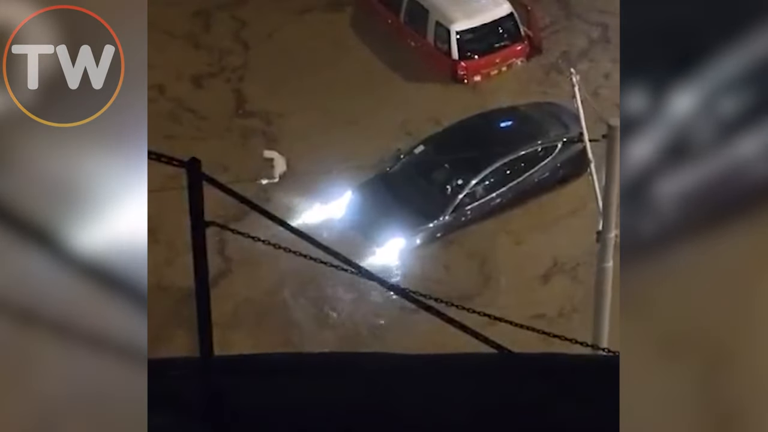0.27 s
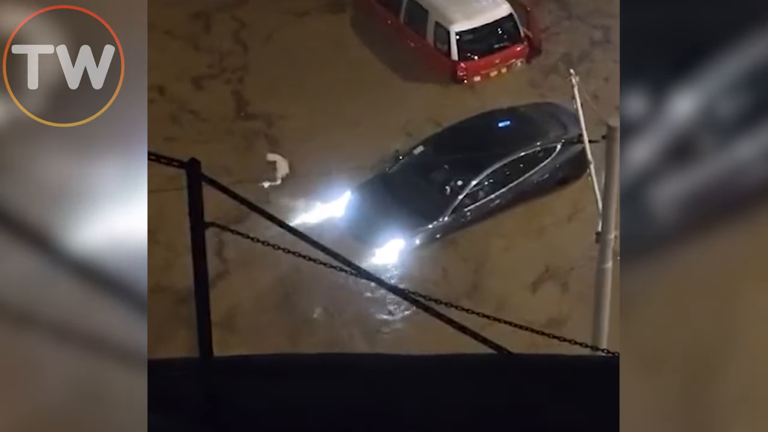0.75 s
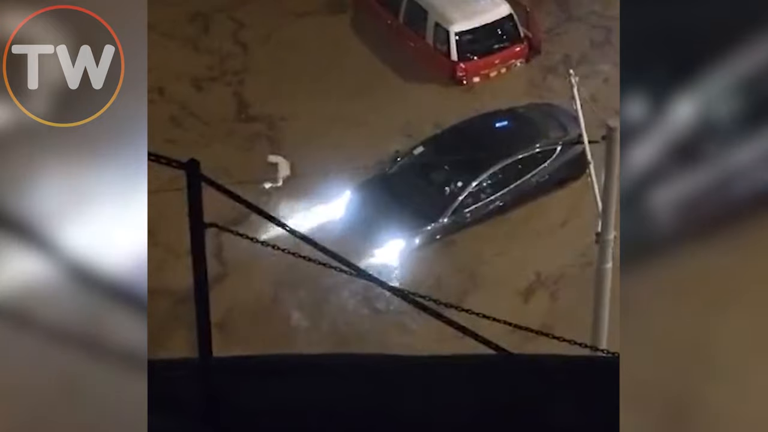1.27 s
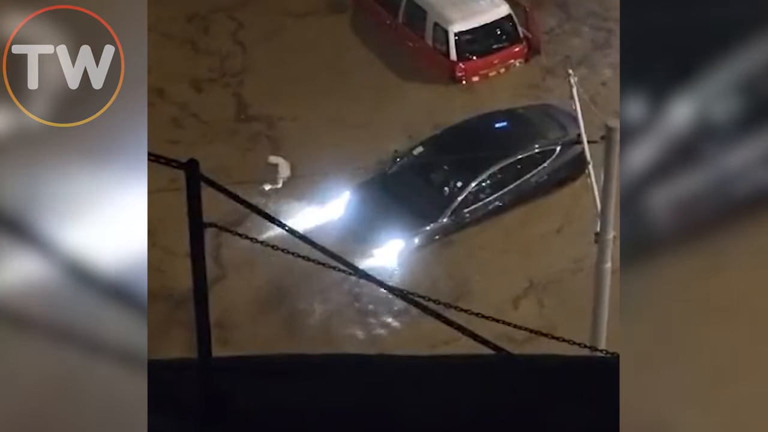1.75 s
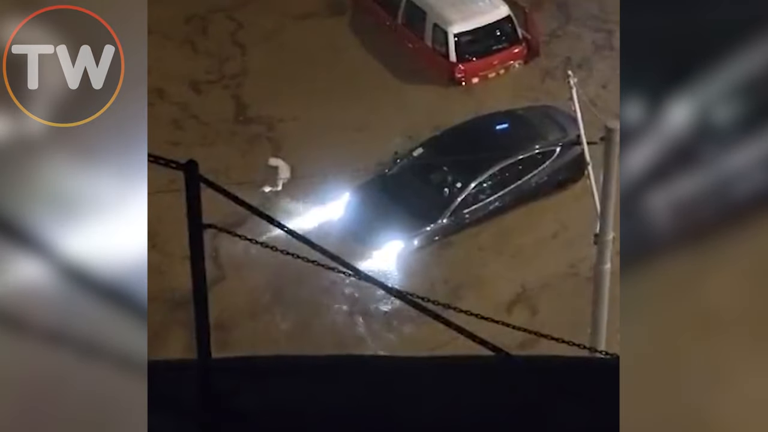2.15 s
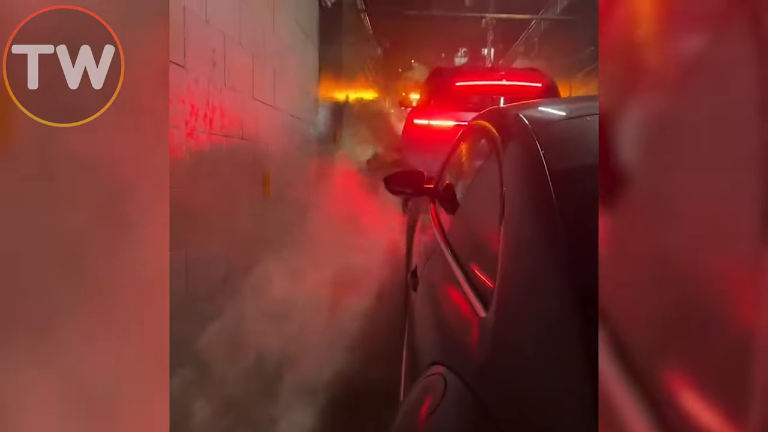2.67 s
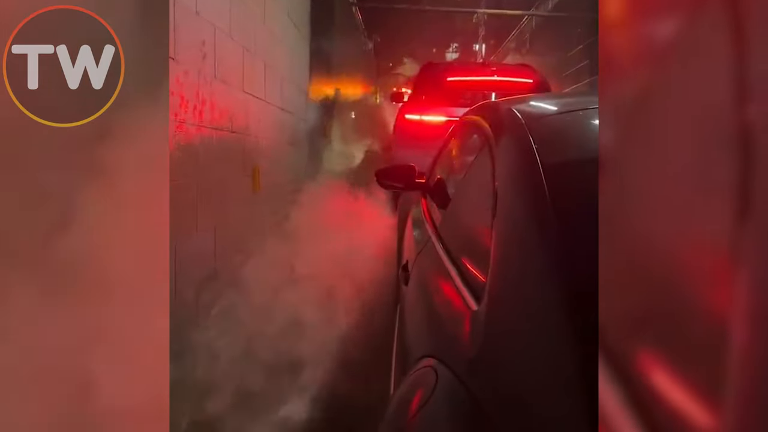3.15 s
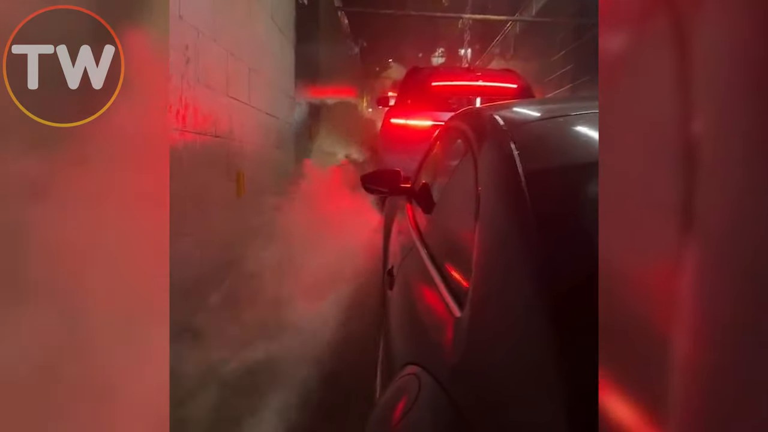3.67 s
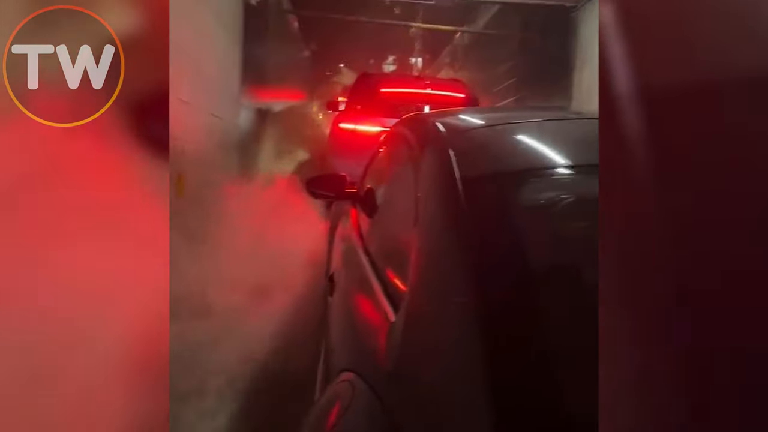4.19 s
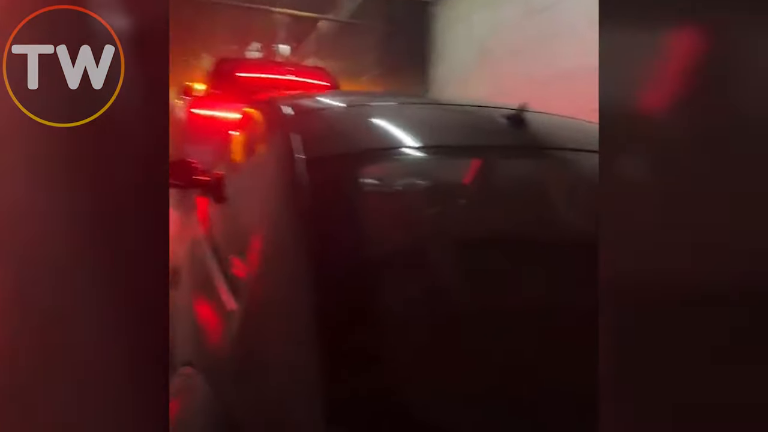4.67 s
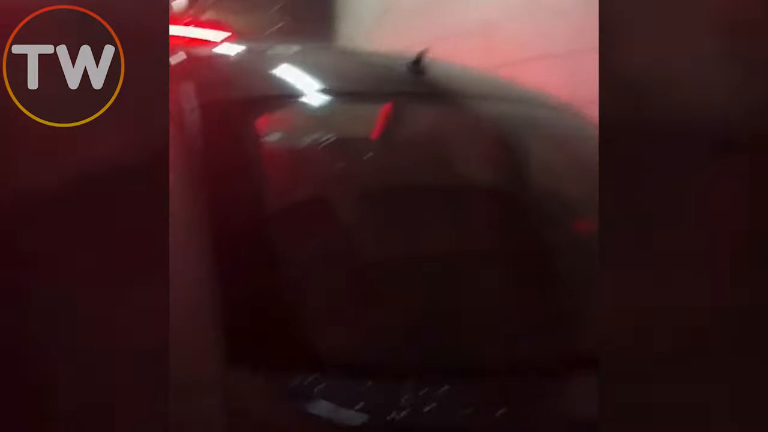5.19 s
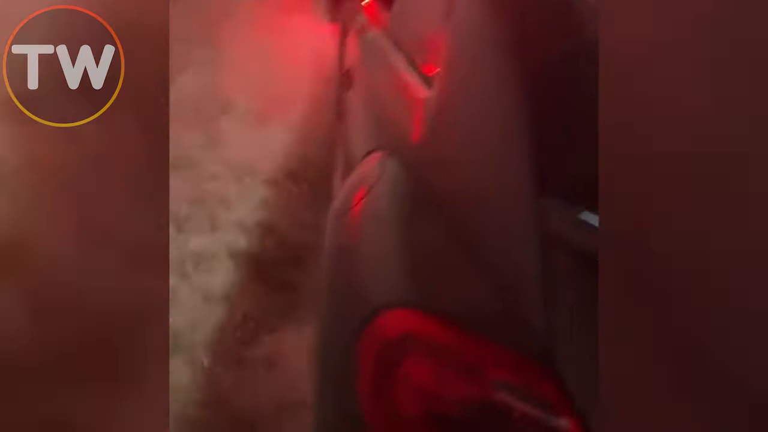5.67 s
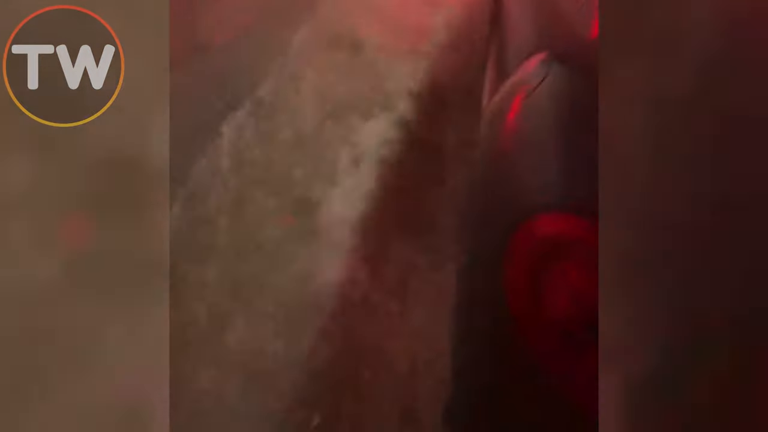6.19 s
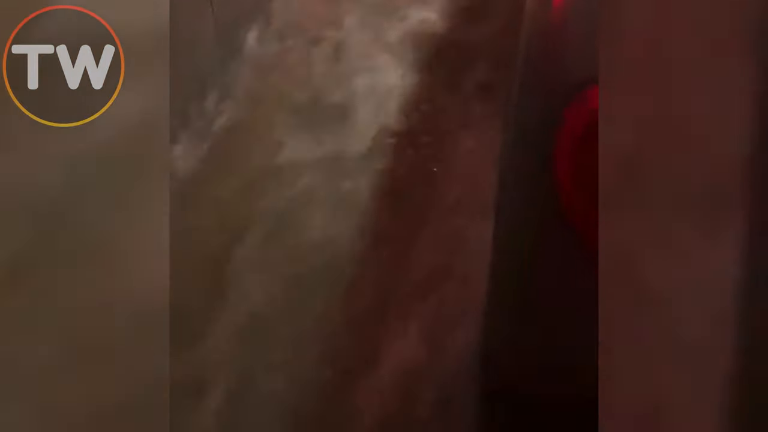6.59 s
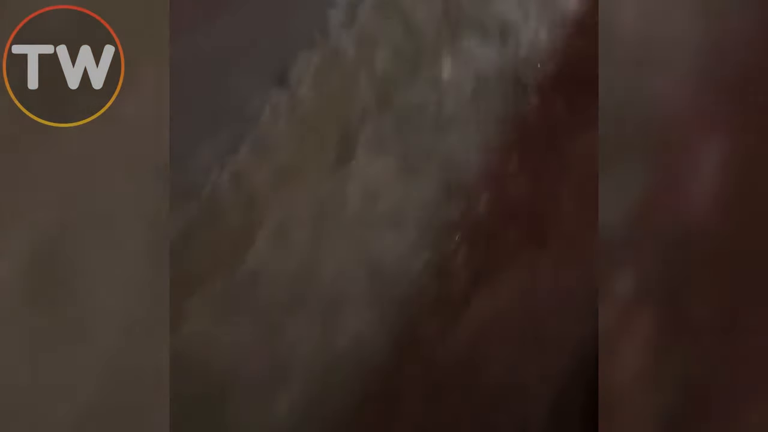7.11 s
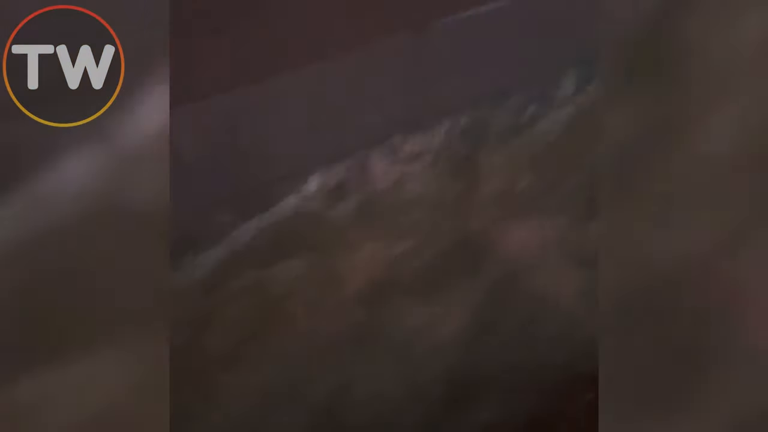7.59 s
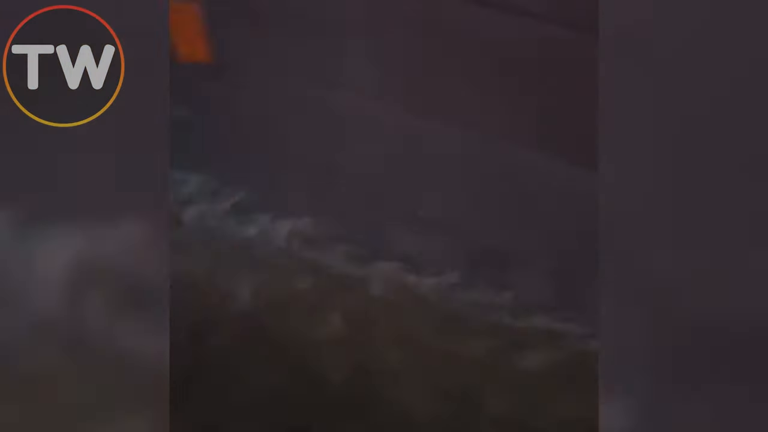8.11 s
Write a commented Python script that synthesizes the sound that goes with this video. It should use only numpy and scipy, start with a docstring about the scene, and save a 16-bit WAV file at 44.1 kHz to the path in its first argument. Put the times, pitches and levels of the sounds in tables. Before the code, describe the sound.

Loud sloshing water and rain over a low labouring car engine stop with a sharp tick; after a gap, a smoother, quieter torrent roars on.

```python
"""A flood, heard as two mono scenes with a short silence between them.
First a drowned street: noise bands make surging water and pattering rain, and a sine with one overtone
makes a labouring car engine. Early on, a few wavering sines squeal briefly.
A sharp tick ends the street, and a moment of silence follows.
Then a torrent pours down a garage ramp: a smoother roar of bubbles and spray, loud at first, then quieter."""
import sys
import numpy as np
from scipy import signal
from scipy.io import wavfile
from scipy.ndimage import uniform_filter1d

SR = 44100
rng = np.random.default_rng(int(sys.argv[2]) if len(sys.argv) > 2 else 0)


def wav_out(sig):
    """Save sig, one row per channel (or a flat mono array), as 16-bit PCM at SR to the path in sys.argv[1]."""
    wavfile.write(sys.argv[1], SR, np.round(np.clip(np.atleast_2d(sig).T, -1, 1) * 32767).astype(np.int16))


N = 368182
TIME = np.arange(N) / SR
LOWEST_HZ, CUTOFF_HZ = 20, 13800
STREET_END_S, RAMP_START_S, RAMP_FADE_S = 2.3665, 2.635, 0.014


def street():
    """Waves slosh unevenly over the road while rain falls on them; both slowly build."""
    # relative loudness of the street water at each pitch: [f/Hz, level/dB]
    wash_colour = [(25, -17.5), (45, -12.5), (100, -4.5), (195, -3.5), (255, 0), (330, -0.5), (420, 1.5),
                   (720, -3), (1200, 1), (1800, -0.5), (2450, -1.2), (3100, -7), (4200, -13), (13000, -35)]
    # relative loudness of the rain at each pitch: [f/Hz, level/dB]
    rain_colour = [(1500, -9.5), (3000, -5.5), (5000, -0.5), (7000, -1.5), (8700, 0), (10200, -21),
                   (12000, -18.5), (13500, -3)]
    # waves that slap and swell: [t/s, level/dB]
    swells = [(.57, 1.5), (.9, 0.7), (1.25, 0.5), (1.6, 1.3), (1.9, 0.7), (2.34, 0.3)]
    swell_width_s = 0.09
    # levels at the start, and how fast they build as the car pushes into the water
    wash_start_db, churn_start_db, rain_start_db = -17.0, -16, -27.4
    build_db_per_s, churn_build_db_per_s = 0.3, 0.6

    wave_bands = water(wash_colour, per_s=2000, spread_db=1.5, near_share=0.4,
                       patchy_db=1.42, patch_rate=16, count=32)
    rain_bands = water(rain_colour, per_s=3900, spread_db=1.5, near_share=0.21,
                       patchy_db=1.0, patch_rate=9.1, count=16)
    wash_db = wash_start_db + build_db_per_s * TIME
    churn_db = churn_start_db + churn_build_db_per_s * TIME
    rain_db = rain_start_db + build_db_per_s * TIME
    wash = flow(wave_bands, wash_db, churn_db, split_hz=910)
    rain = from_db(rain_db) * sum(band for hz, band in rain_bands)
    swell_db = bumps(swells, swell_width_s)
    return flicker(from_db(swell_db) * (wash + rain))


def ramp():
    """Fast water between concrete walls: bubbles merge to an even roar, with fizzing spray on top."""
    # relative loudness of the torrent at each pitch: [f/Hz, level/dB]
    torrent_colour = [(25, -25), (36, -16), (48, -9), (66, -0.5), (105, -2), (140, 0.5), (320, 2.5),
                      (490, 1), (680, -1.5), (1400, -3), (2400, -2.5), (3200, -4.5), (4500, -12.5),
                      (13000, -20.5)]
    # relative loudness of its spray at each pitch: [f/Hz, level/dB]
    spray_colour = [(1500, -13), (3500, -4), (5600, 0.5), (7500, -4), (10000, -8.5), (12500, -13.5),
                    (13500, -7)]
    # levels once the torrent has settled
    settled_rush_db, settled_churn_db, settled_spray_db = -25.5, -28, -34
    # it starts louder, drops quickly, then settles
    drop_s, drop_length_s, drop_db = 3.134, 0.042, 2.5
    settle_db, settle_s = 4.5, 0.57
    # from here on the roar grows and the spray recedes
    turn_s = 4.56
    rush_db_per_s, churn_db_per_s, spray_db_per_s = 0.43, 0.66, -1

    unsettled = np.exp(-np.maximum(TIME - drop_s, 0) / settle_s)
    extra_db = drop_db * (1 - rise(drop_s, drop_length_s)) + settle_db * unsettled
    since_turn_s = np.maximum(TIME - turn_s, 0)
    bubble_bands = water(torrent_colour, per_s=5000, spread_db=2.5, near_share=0.21,
                         patchy_db=0.84, patch_rate=12.4, count=30)
    spray_bands = water(spray_colour, per_s=6000, spread_db=4.0, near_share=0.27,
                        patchy_db=1.3, patch_rate=17, count=12)
    rush_db = settled_rush_db + rush_db_per_s * since_turn_s
    churn_db = settled_churn_db + churn_db_per_s * since_turn_s
    spray_db = settled_spray_db + spray_db_per_s * since_turn_s + 0.5 * drift(rate=20)
    roar = flow(bubble_bands, rush_db, churn_db, split_hz=590)
    spray = from_db(spray_db) * sum(band for hz, band in spray_bands)
    return from_db(extra_db) * (roar + spray)


def squeal(level_db, waver_hz, flutter_db):
    """A short, high, rough squeal: a wavering tone with weaker chatter tones on both sides of it."""
    # the tone and its chatter, placed by distance from the pitch: [f/Hz, level/dB]
    squeal_lines = [(-510, -5), (-250, -11), (0, 0), (350, -9), (490, -6), (1000, -13)]
    # it slides up to its pitch during the attack, holds and dies away
    start_s, attack_s, hold_s, release_s = 0.515, 0.069, 0.051, 0.072
    pitch_hz, slide_hz = 3370, 110

    attack = rise(start_s, attack_s)
    release = 1 - rise(start_s + attack_s + hold_s, release_s)
    hz = pitch_hz - slide_hz * (1 - attack)
    tones = 0
    for offset_hz, line_db in squeal_lines:
        line_hz = hz + offset_hz + waver_hz * drift(rate=140)
        phase = 2 * np.pi * np.cumsum(line_hz) / SR
        tones = tones + from_db(line_db + flutter_db * drift(rate=28)) * np.sin(phase)
    return from_db(level_db) * attack * release * rms_one(tones)


def engine(level_db, lope_db, overtone_db):
    """The half-sunken engine's firing note and one overtone sag under the load and pick up again."""
    # earlier jabs of the throttle: [t/s, level/dB]
    jabs = [(.12, 6), (.84, 10)]
    jab_width_s = 0.09
    start_hz, sag_s, sag_length_s, sag_hz = 62.5, 1.25, 0.45, 9.8
    pickup_s, pickup_hz_per_s = 1.9, 36
    load_db = 7.5   # louder once it labours

    load = rise(sag_s, sag_length_s)
    pickup_hz = pickup_hz_per_s * np.maximum(TIME - pickup_s, 0)
    hz = start_hz - sag_hz * load + pickup_hz
    effort_db = load_db * load + bumps(jabs, jab_width_s)
    phase = 2 * np.pi * np.cumsum(hz) / SR
    note = np.sin(phase) + from_db(overtone_db) * np.sin(2 * phase)
    return from_db(level_db + effort_db + lope_db * drift(rate=9)) * rms_one(note)


def tick():
    """One sharp click, a few samples long, with which the street falls silent."""
    distance = np.arange(N) - round(STREET_END_S * SR)   # in samples
    return 0.59 * np.exp(-(distance / 1.2) ** 2)


def water(spectrum, per_s, spread_db, near_share, patchy_db, patch_rate, count):
    """Near impacts over a blur of far ones, in bands that swell by themselves; gives (Hz, sound)."""
    lowest_hz = max(LOWEST_HZ, spectrum[0][0] / 2 ** 0.5)
    edges = np.geomspace(lowest_hz, CUTOFF_HZ, count + 1)
    drives = []   # two, so that neighbouring bands differ
    for _ in range(2):
        near = np.sqrt(near_share) * impacts(per_s, spread_db)
        far = np.sqrt(1 - near_share) * rng.standard_normal(N)
        drives.append(near + far)
    centres = np.sqrt(edges[:-1] * edges[1:])
    gains = from_db(at_hz(spectrum, centres))
    # all bands together have an average strength (rms) of about 1
    gains = gains / np.sqrt(np.sum(gains ** 2 * np.diff(edges)) * 2 / SR)
    for k, hz in enumerate(centres):
        band_filter = signal.butter(2, edges[k:k + 2], "band", fs=SR, output="sos")
        band = signal.sosfilt(band_filter, drives[k % 2])
        yield hz, band * gains[k] * from_db(patchy_db * drift(patch_rate))


def impacts(per_s, spread_db):
    """Drops or bursting bubbles at random moments, many small and a few large; rms 1."""
    sizes = from_db(spread_db * np.minimum(rng.exponential(1, N), 5))
    signs = rng.choice([-1, 1], N)
    hits = rng.random(N) < per_s / SR
    return rms_one(sizes * signs * hits)


def flow(bands, high_db, churn_db, split_hz):
    """Big air pockets churn below the split, small bubbles rush above it."""
    high, churn = from_db(high_db), from_db(churn_db)
    mix = 0
    for hz, band in bands:
        big = 1 / (1 + (hz / split_hz) ** 4)   # share of big pockets
        mix = mix + band * (big * churn + (1 - big) * high)
    return mix


def flicker(x):
    """Small patches of sound, mostly treble, swell and fade by chance; average gain power stays 1."""
    # how strongly each pitch flickers, before the upward swings are capped: [f/Hz, level/dB]
    flicker_spread = [(2200, 1.0), (3100, 9.0), (4100, 9.5), (5200, 8.0), (6000, 4.5), (8500, 4.5),
                      (10000, 9.0), (13000, 6.5)]
    hz, _, cells = signal.stft(x, SR, nperseg=2048)
    chance = rng.standard_normal(cells.shape)
    # smooth over about 45 ms, then over about 110 Hz
    chance = uniform_filter1d(chance, size=2, axis=1)
    chance = rms_one(uniform_filter1d(chance, size=5, axis=0))
    spread_db = at_hz(flicker_spread, hz + 1)[:, None]   # + 1 avoids the log of zero
    gain = from_db(spread_db * np.minimum(chance, 1))
    gain = gain / np.sqrt(np.mean(gain ** 2, axis=1, keepdims=True))
    return signal.istft(cells * gain, SR)[1][:N]


def drift(rate):
    """Smooth chance of spread 1 that changes about `rate` times a second."""
    # made at every 40th sample, without the first 2000 values while the filter warms up
    r = np.exp(-80 * np.pi * rate / SR)
    noise = rng.standard_normal(N // 40 + 2002)
    slow = signal.lfilter([1], [1, -2 * r, r * r], noise)[2000:]
    return np.interp(np.arange(N) / 40, np.arange(len(slow)), rms_one(slow))


def rise(start_s, length_s):
    """From 0 to 1 in a straight line."""
    return np.clip((TIME - start_s) / length_s, 0, 1)


def bumps(rows, width_s):
    """A smooth hump in dB for every (s, dB) row."""
    return sum(db * np.exp(-((TIME - s) / width_s) ** 2) for s, db in rows)


def at_hz(points, hz):
    """Read a dB curve at the given pitches, on a log-frequency axis."""
    point_hz, point_db = np.transpose(points)
    return np.interp(np.log(hz), np.log(point_hz), point_db)


def from_db(db):
    """Decibels to gain."""
    return np.exp(np.asarray(db) * (np.log(10) / 20))


def rms_one(x):
    """Scale to an average strength (rms) of 1."""
    return x / np.sqrt(np.mean(x ** 2) + 1e-20)


def scene():
    """The street, a tick and a moment of silence, then the ramp; the same in both ears."""
    outside = street() + squeal(level_db=-22, waver_hz=30, flutter_db=4)
    outside = outside + engine(level_db=-44, lope_db=1.2, overtone_db=-12)
    fade_in = rise(RAMP_START_S, RAMP_FADE_S) ** 2
    mono = outside * (TIME < STREET_END_S) + tick() + ramp() * fade_in
    return np.stack([mono, mono])


def record(dry):
    """A steep low-pass filter removes the very top of the treble."""
    top_cut = signal.ellip(12, 0.1, 80, CUTOFF_HZ, fs=SR, output="sos")
    return signal.sosfilt(top_cut, dry)


dry = scene()
out = record(dry)
wav_out(out)
```